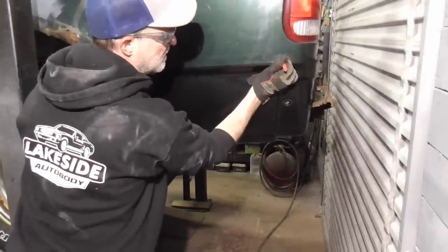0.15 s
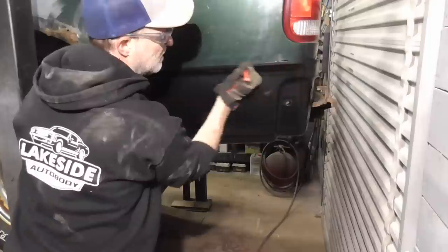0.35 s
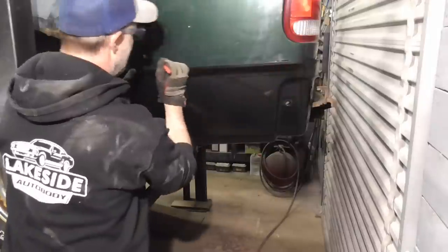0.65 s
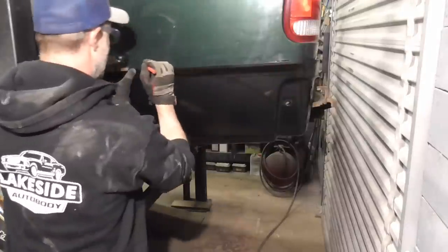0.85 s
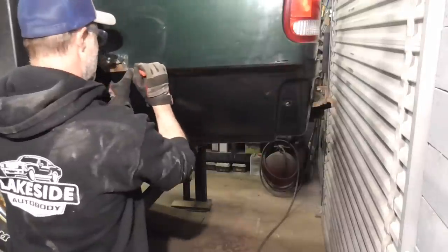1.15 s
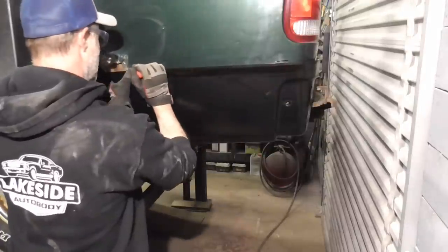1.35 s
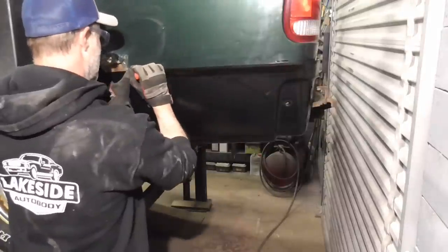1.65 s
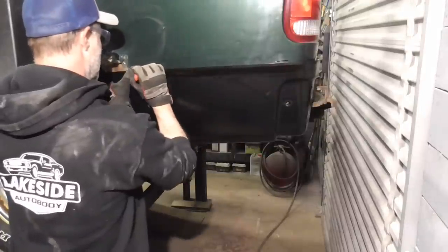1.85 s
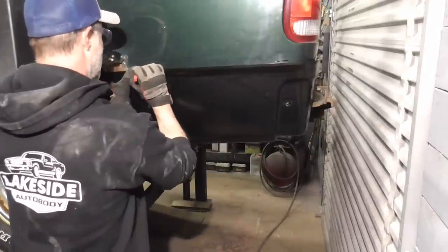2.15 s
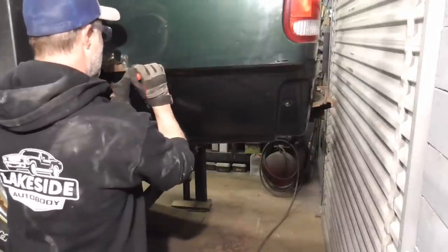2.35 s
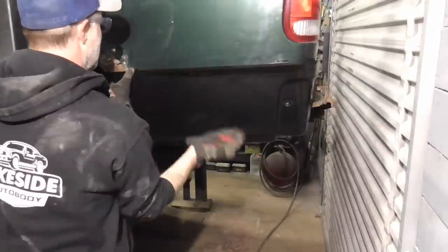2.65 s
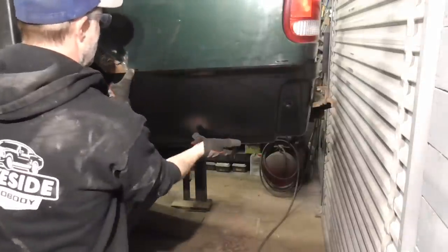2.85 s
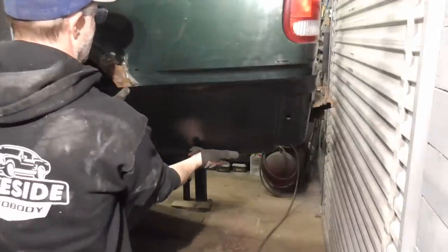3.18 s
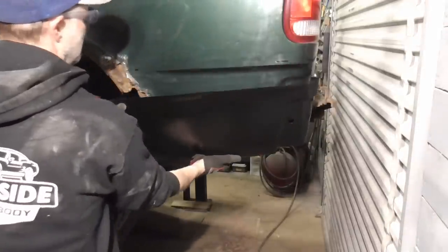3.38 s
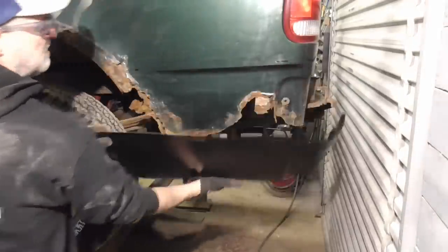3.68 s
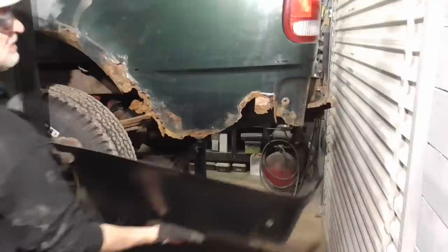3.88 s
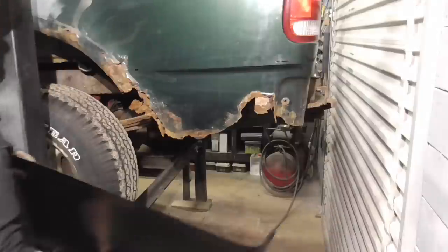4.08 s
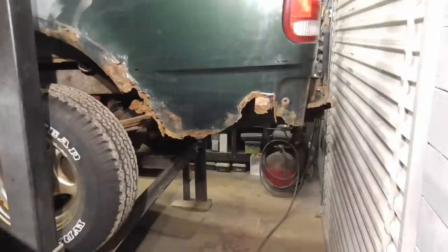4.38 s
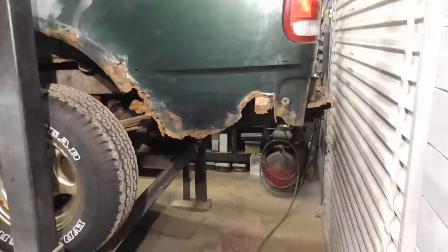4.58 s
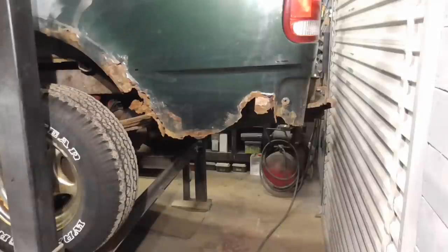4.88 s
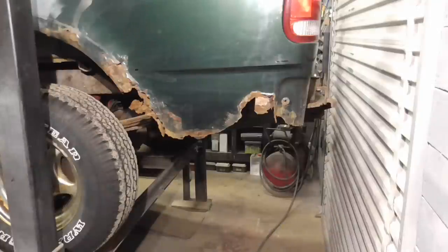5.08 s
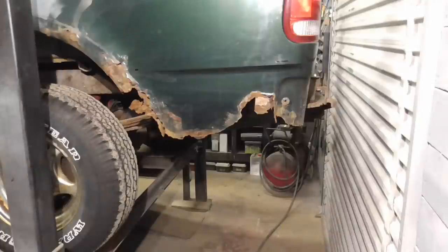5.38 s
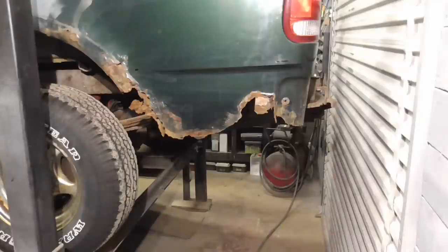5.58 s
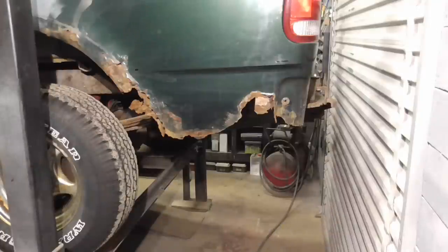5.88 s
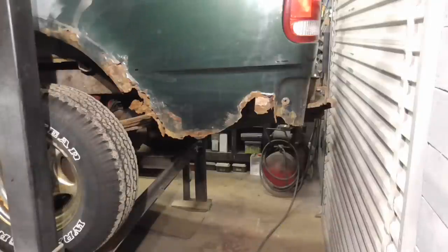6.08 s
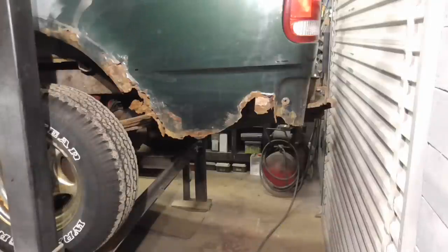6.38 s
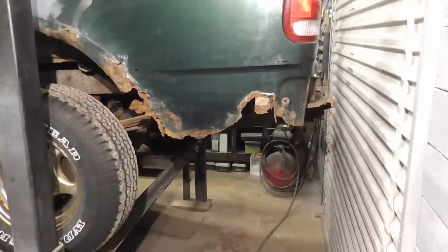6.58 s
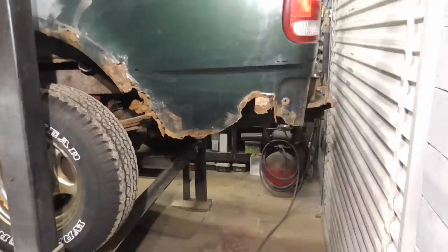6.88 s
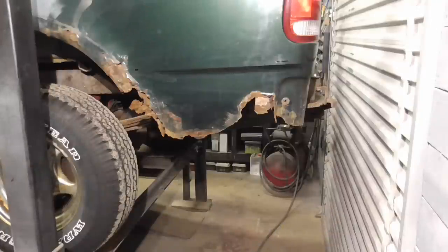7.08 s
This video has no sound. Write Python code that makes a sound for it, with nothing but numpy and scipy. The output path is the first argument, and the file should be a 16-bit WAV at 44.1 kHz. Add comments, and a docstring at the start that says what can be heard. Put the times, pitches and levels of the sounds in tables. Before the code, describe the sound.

A low, steady ventilation-like noise runs throughout a workshop, heard in stereo from fairly close. From 0 to 2.6 seconds, gloves rub softly on paint and a thin steel panel, with a dull bump at 0.3, faint knocks near 1.0 and a clearer tap at 1.4, plus light dragging. At 2.7 to 3.6 the panel comes off the truck body: sharp tinny knocks, strongest around 2.9 and 3.2, scrapes, short hollow hums and a thin squeal at 3.5. Crisp grit ticks follow until 3.9. Fabric swishes faintly around 4.2, a shoe scuffs at 4.5, and soft steps fall near 4.9, 5.3 and 5.9. At 6.35 the sheet's edge hits the floor with a loud ringing clatter, bounces at 6.5, then skids, judders and scrapes with a hollow hum near 6.9, damping out after 7.0.

```python
"""Rubs, knocks and scrapes of a thin steel panel held on a truck body in a workshop, then steps and a shoe scuff
as it is carried off; it lands on its edge with a ringing clatter and slides to rest over a low, steady noise.
Blows are noise bursts plus ringing sine modes; rubbing is noise chopped into tiny slips, which on steel also
excite the modes. Low thuds and short hums are swelling sines, a squeal and a fabric swish are fuzzy tones,
grit is short bright noise and the ventilation-like room is steady coloured noise."""
import sys
import numpy as np
from scipy import signal
from scipy.fft import rfft, irfft
from scipy.io import wavfile

SR = 44100
rng = np.random.default_rng(int(sys.argv[2]) if len(sys.argv) > 2 else 0)


def unload_audio(sound):
    """Save the sound as a 16-bit wav file, at the path given as the first command line argument."""
    columns = np.transpose(np.atleast_2d(sound))
    # keep every value between -1 and 1, then stretch to whole-number steps
    steps = np.round(np.clip(columns, -1, 1) * 32767)
    wavfile.write(sys.argv[1], SR, steps.astype(np.int16))


N = 319284

# Bass, body, clank, rasp and hiss bands. Each row: low edge in Hz, high edge in Hz.
BANDS = [(60, 260), (260, 650), (650, 1500), (1500, 5500), (5500, 16000)]
BAND_HZ = np.sqrt(np.prod(BANDS, axis=1))  # band centres

# Blows on the held panel. Each row: start in seconds, level in dB, brightness in dB per octave, bass thud in dB,
# t60 at 1 kHz in seconds, contact crack in dB re level, ring in dB, favoured pitch in Hz.
KNOCKS = [(0.957, -50.5, -1, 13.5, 0.25, 4, -61, 530), (1.413, -37.5, -0.86, 7, 0.23, -14, -77, 2170),
          (2.678, -46, -2, 2, 0.36, 8, -78, 1130), (2.836, -43, -2.7, 8.5, 0.28, -4, -68, 820),
          (2.935, -28.5, 0, 0.5, 0.31, 4.5, -39.5, 3050), (3.17, -26, -0.74, -0.5, 0.27, 4.5, -34.5, 1060),
          (3.256, -35.5, -4.5, -10, 0.29, -4, -50, 3500), (3.496, -40.5, 2.7, -7, 0.16, 0, -62, 1600),
          (3.562, -36.5, -0.7, 1, 0.39, 5, -45, 2670)]
# The panel's edge hits the floor and bounces. Each row: start in seconds, level in dB, brightness in dB per
# octave, bass thud in dB, t60 at 1 kHz in seconds, crack in dB re level, ring in dB, favoured pitch in Hz.
CLATTERS = [(6.347, -23, -3.02, -4, 0.24, -15, -31, 347), (6.359, -32.5, -9.5, -5.5, 0.4, -3, -56, 650),
            (6.388, -30, -7, -6.5, 0.66, -10, -62, 426), (6.506, -31, -1.3, 8.5, 0.62, -12, -38.5, 1010)]
# The panel's edge drags on the truck body. Each row: start, rise, hold and fade t60 in seconds, level in dB,
# brightness in dB per octave.
DRAGS = [(1.16, 0.015, 0.3, 0.14, -58.5, -2.5), (2.37, 0.022, 0.031, 0.26, -52, -3),
         (2.815, 0.01, .015, 1, -45, -0.3), (2.98, 0.028, 0.23, 0.29, -50.5, 0),
         (3.14, 0.017, .005, 0.092, -37.5, 0), (3.18, 0.069, 0.25, 0.29, -45, -4),
         (3.245, 0.0053, 0.0051, 0.74, -39.5, 0.25), (3.483, 0.01, 0.075, 0.1, -37, 0),
         (3.55, 0.04, 0.036, 0.81, -63, -10)]
# The standing panel skids, judders along the floor and scrapes to rest. Each row: start, rise, hold and
# fade t60 in seconds, level in dB, brightness in dB per octave.
SLIDES = [(6.512, 0.013, 0.0092, 0.18, -36.5, 2), (6.66, 0.12, 0.2, 0.91, -32.5, -4),
          (6.825, 0.026, 0.054, 0.89, -32, -.5)]
# Dull footfall bumps, panel modes humming and the sheet's bass bumps. Each row: start in seconds, level in dB,
# pitch in Hz, rise in seconds, t60 in seconds.
THUDS_AND_HUMS = [(0.293, -39.5, 170, .012, 0.26), (0.992, -39, 147, .01, 0.15),
                  (2.391, -43, 173, 0.012, 0.11), (2.938, -30.5, 333.3, 0.011, 0.41),
                  (3.17, -27, 493.4, 0.0088, 0.5), (3.195, -26, 328.6, 0.019, 0.15),
                  (3.21, -41, 67.3, .05, 0.96), (3.276, -33.5, 177, 0.024, 0.12),
                  (3.33, -31, 196, 0.0094, 0.15), (3.391, -26.5, 139, 0.038, 0.046),
                  (3.511, -24.5, 338.2, 0.05, 0.39), (6.344, -23, 251, 0.004, 0.14),
                  (6.504, -21, 183, .003, 0.048), (6.921, -24, 408.6, 0.077, .3),
                  (6.95, -32, 179.2, 0.02, 0.43)]
# Narrow fuzzy bands: a thin squeal of the rubbed sheet, then a whistling swish of fabric. Each row: start, rise,
# hold and fade t60 in seconds, level in dB, pitch in Hz, sag in Hz per second (negative climbs), width in Hz.
SQUEAL_AND_SWISH = [(3.473, .05, 0.025, 0.4, -42.5, 3420, -5, 109),
                    (4.135, 0.093, 0.11, .4, -54, 4450, 606, 510)]
# Small sharp ticks of grit. Each row: start in seconds, level in dB, pitch in Hz.
TICKS = [(2.3727, -41, 11400), (3.0592, -29, 12200), (3.6607, -21.5, 13500), (3.768, -31, 12300),
         (3.8938, -32.5, 12360), (3.911, -28, 9560)]
# The glove rubs on the paint. Each row: start, rise, hold and fade t60 in seconds, level in dB,
# brightness in dB per octave.
GLOVE_RUBS = [(0.045, 0.023, .02, 0.27, -50, -2), (0.175, 0.011, 0.016, 0.41, -44.5, -6),
              (0.33, 0.1, 0.2, .5, -68, 5.5), (0.48, 0.1, 0.26, 0.29, -55.5, 1.5),
              (0.95, 0.016, 0.024, 0.96, -63.5, 1), (1.155, .012, 0.0091, 0.23, -46.5, -1),
              (1.28, 0.078, .02, 0.091, -71, 4), (2.19, 0.035, .01, 0.14, -49.5, -4.5),
              (2.368, 0.0041, .01, 0.1, -41, -2.5), (2.52, 0.055, .01, 0.32, -57, -0.5)]
# Soles and clothes brush along. Each row: start, rise, hold and fade t60 in seconds, level in dB,
# brightness in dB per octave.
SCUFFS = [(3.91, 0.048, 0.009, 0.36, -59, 2.5), (4.17, 0.245, 0.036, 0.18, -49, 1.5),
          (4.453, 0.02, 0.087, 0.26, -38, 0), (5.08, 0.039, 0.035, 0.14, -55.5, -8),
          (5.3, .17, 0.0098, 0.38, -55.5, 1.14), (5.855, 0.017, 0.12, 0.19, -57.5, 1.75)]
# Footfalls and dull bumps. Each row: start in seconds, level in dB, brightness in dB per octave,
# bass thud in dB, t60 at 1 kHz in seconds, favoured pitch in Hz.
STEPS = [(4.306, -50, 1, 14, 0.18, 110), (4.928, -40, -2.56, -23, 0.29, 1260),
         (5.234, -55.5, -8, -3.5, 0.099, 395), (5.377, -51.5, -6.5, -6, .1, 260),
         (5.878, -45, -4, -4.5, 0.16, 790), (5.892, -59.5, -7.5, 1.5, 0.14, 130)]

# Panel modes when held, standing on its edge, and leaning. Each row: pitch in Hz, relative level in dB,
# t60 in seconds.
HELD_MODES = [(339, 9, 0.45), (456, -1, 0.7), (513, 3, 0.7), (565, -4, 0.7), (631, -4, 0.6), (775, 2, 0.3),
              (866, 4, 0.35), (903, -2, 1.0), (946, 1, 0.8), (972, -2, 0.9), (995, -2, 0.9), (1196, 6, 1.3),
              (1232, 4, 0.3), (1316, 4, 0.7), (1338, -1, 0.8), (1540, 1, 1.1), (1604, -2, 0.9),
              (1724, -1, 0.9), (1946, -2, 0.7), (2137, 4, 0.6), (2150, 9, 0.25), (2222, 0, 0.8),
              (3363, -2, 0.6), (4060, 3, 0.25), (4660, -1, 0.25)]
ON_EDGE_MODES = [(138, 4, 1.0), (151, 3, 1.0), (184, 0, 0.8), (233, -3, 1.6), (323, 3, 1.6), (371, -2, 1.6),
                 (413, 0, 1.6), (437, 12, 1.4), (460, -1, 1.6), (534, -2, 1.6), (583, 1, 1.6),
                 (724, 9, 1.6), (789, -2, 1.6), (898, 3, 1.2), (1074, 2, 1.6), (1191, 5, 1.1),
                 (1237, -1, 1.2), (1320, 2, 1.2), (1353, 0, 1.3), (1400, 8, 1.4), (1665, 6, 1.3),
                 (1813, 0, 1.3), (1946, 0, 1.2), (2129, 8, 1.2), (2356, 1, 1.0), (2449, 3, 1.1),
                 (2568, 2, 0.9), (2757, 0, 1.2), (2972, 1, 1.0), (4124, 2, 0.9)]
LEANING_MODES = [(122, 1, 0.8), (166, 6, 0.7), (195, 0, 1.1), (312, 2, 1.1), (371, 6, 0.8), (408, 9, 0.4),
                 (432, 2, 0.5), (459, 0, 0.7), (536, 2, 0.6), (634, 7, 0.6), (724, 3, 0.8), (767, 1, 1.1),
                 (911, 5, 1.1), (950, 2, 0.6), (989, 4, 0.5), (1130, 3, 0.9), (1525, 3, 1.1),
                 (1647, 3, 1.1), (1950, 4, 0.8), (2063, 5, 0.9), (2132, 3, 0.8), (2757, 3, 0.9),
                 (4114, 1, 0.5)]

# How each contact shares its sound among the bands. Each entry: offset in dB, one per band from bass to hiss.
KNOCK_SHAPE = [0, -1, 1, -1, 0]
CLATTER_SHAPE = [-19, -14, -3.5, -3, 6]
STEP_SHAPE = [-1, -6.5, 0, 2, 4.5]
DRAG_SHAPE = [-3.4, -4.4, -4.7, -4.4, 0.2]
SLIDE_SHAPE = [-23, -6.5, -4, -6, 0.5]
# Light rubbing only reaches the top bands. Each entry: offset in dB, the last one for hiss.
SCUFF_SHAPE = [0, -3, 0]
GLOVE_SHAPE = [-6, 0]

# Broad noise colours of panel, floor, glove and room. Each row: frequency in Hz, relative spectrum level in dB.
HELD_COLOUR = [(30, 0), (65, -21), (140, -1), (260, -9), (340, -2.5), (600, -6), (850, -2), (1300, -9),
               (1750, -20.5), (2200, -17), (2700, -24), (4100, -20.5), (6300, -25.5), (12500, -14),
               (16000, -28.5)]
FREE_COLOUR = [(30, -60), (70, -35), (140, 3.5), (240, -10), (375, -4.5), (437, 0.5), (560, -2.5),
               (780, 7.5), (1200, 0.5), (1750, -12), (2150, -7), (4100, -17), (6000, -35), (11000, -30.5),
               (16000, -48)]
STEP_COLOUR = [(35, -41), (60, -20), (118, -0.5), (202, -9), (398, -7.5), (882, -0.5), (1170, -8.5),
               (1700, -25.5), (2350, -18.5), (2900, -22), (3580, -18.5), (5860, -20), (7940, -10.5),
               (13000, -13), (16000, -27)]
GLOVE_COLOUR = [(710, -38), (1200, -3.5), (2180, -4.5), (3010, -7), (3830, -2.5), (6800, -6), (12700, 4.5),
                (14800, -7), (16000, -27)]
AIR_COLOUR = [(15, -67), (25, -47), (45, -13.5), (92, -5), (161, 1), (229, -5), (344, -10), (384, -6),
              (416, -11.5), (695, -6), (818, -9.5), (1400, -14), (1740, -25.5), (3250, -29), (3620, -25),
              (5000, -31), (6050, -32), (8140, -28), (16000, -27)]

# Left-right likeness at each place. Each row: frequency in Hz, correlation from -1 to 1.
HELD_SAME = [(60, 1), (180, 1), (550, 0.76), (1650, 0.6), (4970, 0.47), (15000, 0.22)]
FREE_SAME = [(60, 1), (180, 0.84), (550, 0.68), (1650, 0.56), (4970, 0.36), (15000, -0.31)]
AIR_SAME = [(60, 1), (180, 0.93), (550, 0.63), (1650, 0.57), (4970, 0.27), (15000, 0.052)]
# Stereo balance at each place. Each row: frequency in Hz, left over right in dB.
HELD_SIDE = [(60, 3.5), (180, -1.1), (550, -0.3), (1650, -2), (4970, -1.5), (15000, -1)]
FREE_SIDE = [(60, -0.17), (180, 0.078), (550, 1.0), (1650, 0.36), (4970, -0.049), (15000, -2.9)]
AIR_SIDE = [(60, 0.58), (180, -1.3), (550, 0.95), (1650, -0.17), (4970, -0.22), (15000, -1.2)]


def held_panel():
    """Knocks and dragging against the truck body; once it is free, the gloves grip it and deaden its ring."""
    place = HELD_COLOUR, HELD_SAME, HELD_SIDE, 3.5  # last: ripple in dB
    knocks = struck_panel(KNOCKS, HELD_MODES, KNOCK_SHAPE, place, clang_db=5, focus_db=15.5, lag=0.011,
                          tail_db=-31, tail_t60=0.33, damping=0.074)
    drag = friction(DRAGS, DRAG_SHAPE, place, slips_per_s=500, spread_db=3.5, smooth=0.5, t60=0.04)
    grip_s, grip_db_per_s = 3.6, 50
    grip = amp(-grip_db_per_s * np.maximum(np.arange(N) / SR - grip_s, 0))
    return grip * (knocks + singing(drag, HELD_MODES, ring_db=-13.5, top_hz=1580))


def panel_set_down():
    """Free of the hands, the sheet clatters, rings long and slides to rest, where leaning damps it."""
    place = FREE_COLOUR, FREE_SAME, FREE_SIDE, 4  # last: ripple in dB
    clatter = struck_panel(CLATTERS, ON_EDGE_MODES, CLATTER_SHAPE, place, clang_db=11.5, focus_db=9, lag=0.0033,
                           tail_db=-14, tail_t60=0.7, damping=0.024)
    slide = friction(SLIDES, SLIDE_SHAPE, place, slips_per_s=790, spread_db=3.5, smooth=1.0, t60=0.075)
    rest_s, damping_db_per_s = 7.03, 15
    rest = amp(-damping_db_per_s * np.maximum(np.arange(N) / SR - rest_s, 0))
    return rest * (clatter + singing(slide, LEANING_MODES, ring_db=-9, top_hz=1400))


def thuds_and_hums():
    """Dull footfall bumps, humming panel modes and the sheet's bass bumps, each a swelling, dying sine."""
    out = np.zeros((2, N))
    for s, db, hz, rise, t60 in THUDS_AND_HUMS:
        envelope = stroke_envelope(rise, 0, t60)
        t = np.arange(len(envelope)) / SR
        add(out, s, amp(db) * envelope * np.sin(2 * np.pi * hz * t))
    return out


def squeal_and_swish():
    """A thin squeal, then a whistling fabric swish: slow noise modulates a sine whose pitch slides steadily."""
    out, t = np.zeros((2, N)), np.arange(SR) / SR
    for s, rise, hold, fade, db, hz, sag, width_hz in SQUEAL_AND_SWISH:
        envelope = stroke_envelope(rise, hold, fade)[:SR]
        fuzz = lowpass(rng.standard_normal((2, SR)), width_hz / 2)
        carrier = np.sin(2 * np.pi * np.cumsum(hz - sag * t) / SR)
        tone = evened(fuzz * carrier)
        add(out, s, amp(db) * envelope * tone[:, :len(envelope)])
    return out


def grit():
    """Flakes of rust tick on the sheet: a very short bright noise burst with a faint tail."""
    out, t = np.zeros((2, N)), np.arange(SR // 8) / SR
    for s, db, hz in TICKS:
        # rises towards the pitch; above it stays at the last level
        colour = [(hz / 2.5, -25), (hz / 1.1, -3), (hz, 0), (hz * 0.99, -9)]
        fade = amp(-60 * t / 0.0045) + amp(-24 - 60 * t / 0.38)
        tick = fade * noise_pair(colour, HELD_SAME, HELD_SIDE, ripple_db=4, size=len(t))
        add(out, s, amp(db) * band(tick, BANDS[-1]))
    return out


def worker():
    """The glove's hiss on paint, then steps and scuffs on the concrete."""
    ripple_db = 1.2
    paint = GLOVE_COLOUR, HELD_SAME, AIR_SIDE, ripple_db
    concrete = STEP_COLOUR, FREE_SAME, AIR_SIDE, ripple_db
    out = friction(GLOVE_RUBS, GLOVE_SHAPE, paint, slips_per_s=4600, spread_db=8, smooth=1.0, t60=0.051)
    out += friction(SCUFFS, SCUFF_SHAPE, concrete, slips_per_s=810, spread_db=0.5, smooth=0.66, t60=0.068)
    for s, db, brightness, thud_db, t60, favoured_hz in STEPS:
        levels = band_levels(STEP_SHAPE, db, brightness, thud_db)
        step = blow(levels, t60, lag=0.00037, crack_db=-75, place=concrete,
                    tail_db=-34, tail_t60=0.45, damping=0.01)
        add(out, s, clang(step, favoured_hz, gain_db=9.0))
    return out


def room_air():
    """The low, steady ventilation-like noise of the room: coloured noise at a constant level."""
    level_db = -51
    return amp(level_db) * noise_pair(AIR_COLOUR, AIR_SAME, AIR_SIDE, ripple_db=1.0, size=N)


def struck_panel(rows, modes, shape, place, clang_db, focus_db, **contact):
    """Each blow also rings the panel's long modes, focus_db weaker for each octave from the pitch it favours."""
    out = np.zeros((2, N))
    for s, db, brightness, thud_db, t60, crack_db, ring_db, favoured_hz in rows:
        hz, rings = mode_rings(modes)
        mode_gain = amp(ring_db - focus_db * abs(np.log2(hz / favoured_hz)))
        ring = np.tensordot(mode_gain, rings, 1)
        ring *= 1 - np.exp(-np.arange(ring.shape[1]) / SR / 0.00055)  # soft onset
        levels = band_levels(shape, db, brightness, thud_db)
        hit = blow(levels, t60, crack_db=crack_db, place=place, **contact)
        add(out, s, ring + clang(hit, favoured_hz, clang_db))
    return out


def blow(levels, t60, lag, crack_db, place, tail_db, tail_t60, damping):
    """A contact crack, then a crowd of short modes and room echoes; bending waves bring the bass late."""
    t = np.arange(SR) / SR
    crowd, out = noise_pair(*place, size=SR), np.zeros((2, SR))
    for edges, khz, db in zip(BANDS, BAND_HZ / 1000, levels):
        swell = 1 - np.exp(-t * khz / (lag / 2 + 1e-5))
        body_fade = amp(-60 * t / (t60 * khz ** -damping))  # treble dies sooner
        echo_fade = amp(tail_db - 60 * t / tail_t60)
        crack = amp(crack_db - 60 * t / 0.012) * min(khz, 1)
        envelope = swell * np.hypot(body_fade, echo_fade) + crack
        out += amp(db) * evened(band(crowd, edges)) * envelope
    return out


def friction(strokes, shape, place, slips_per_s, spread_db, smooth, t60):
    """Each stroke is a run of tiny slips of uneven size, each slip a short dying burst."""
    out = np.zeros((2, N))
    for s, rise, hold, fade, db, brightness in strokes:
        envelope = stroke_envelope(rise, hold, fade)[:SR]
        is_slip = rng.random(SR) < slips_per_s / SR
        slips = is_slip * amp(spread_db * np.minimum(rng.exponential(1, SR), 4))
        power = signal.lfilter([1], [1, -amp(-60 / t60 / SR) ** 2], slips ** 2)
        roughness = np.hypot(evened(np.sqrt(power)), smooth)  # smooth adds a steady hiss
        rub = roughness * noise_pair(*place, size=SR)
        levels = band_levels(shape, db, brightness)
        sound = sum(amp(level) * evened(band(rub, edges))
                    for edges, level in zip(BANDS[-len(shape):], levels))
        add(out, s, sound[:, :len(envelope)] * envelope)
    return out


def singing(rub, modes, ring_db, top_hz):
    """Rubbing keeps the panel's modes ringing, mostly those under top_hz."""
    response = mode_rings(modes)[1].sum(0)
    response = response / np.linalg.norm(response[0])
    ring = signal.fftconvolve(lowpass(rub, top_hz), response, axes=1)[:, :N]
    return rub + amp(ring_db) * ring


def mode_rings(modes):
    """Frequencies and dying stereo sines of the modes; the sheet's slow wobble bends each pitch a little."""
    hz, db, t60 = np.transpose(modes)
    t = np.arange(SR) / SR
    one_each = (len(hz), 1, 1)
    phase = rng.uniform(0, 2 * np.pi, one_each) + 0.14 * rng.standard_normal((len(hz), 2, 1))
    wobble_hz = rng.uniform(2.33, 7.7, one_each)
    wobble = 0.5 * np.sin(2 * np.pi * (wobble_hz * t + rng.random(one_each)))
    fade = amp(db[:, None] - 60 * t / t60[:, None])
    return hz, fade[:, None] * np.sin(2 * np.pi * hz[:, None, None] * t + phase + wobble)


def clang(x, hz, gain_db):
    """Where and how hard a thing is struck lifts a broad range around one pitch."""
    b, a = signal.iirpeak(hz, 1.2, fs=SR)
    return x + (amp(gain_db) - 1) * signal.lfilter(b, a, x)


def band_levels(shape, db, brightness, thud_db=0):
    """Levels of the top bands of a contact: brightness tilts them about 1 kHz, a heavy touch adds bass."""
    hz = BAND_HZ[-len(shape):]
    tilt = brightness * np.log2(hz / 1000)
    return db + np.array(shape) + tilt + thud_db * (hz == BAND_HZ[0])


def stroke_envelope(rise, hold, t60):
    """A sound swells, holds, and dies away."""
    t = np.arange(0, rise + hold + t60, 1 / SR)
    swell = np.sin(np.pi / 2 * np.minimum(t / rise, 1)) ** 2
    return swell * amp(-60 * np.maximum(t - rise - hold, 0) / t60)


def noise_pair(colour, same, side, ripple_db, size):
    """Coloured left-right noise, partly alike; crowded modes ripple the spectrum."""
    hz = np.fft.rfftfreq(size, 1 / SR)
    knots = np.arange(0, SR / 2, 90)
    ripple = np.interp(hz, knots, rng.standard_normal(len(knots))) * np.minimum(hz / 2000, 1)
    common, apart = rfft(rng.standard_normal((2, size)))
    likeness = np.clip(read(same, hz), -1, 1)
    sign = np.array([[1], [-1]])  # left, right
    pair = np.sqrt(1 + likeness) * common + sign * np.sqrt(1 - likeness) * apart
    pair = pair * amp(sign * read(side, hz) / 2)
    return evened(irfft(pair * amp(read(colour, hz) + ripple_db * ripple), size))


def band(x, edges):
    """Causal band-pass."""
    return signal.sosfilt(signal.butter(4, edges, "band", fs=SR, output="sos"), x)


def lowpass(x, hz):
    """Gentle causal low-pass."""
    return signal.sosfilt(signal.butter(2, hz, fs=SR, output="sos"), x)


def amp(db):
    """Decibels to gain."""
    return 10 ** (np.asarray(db) / 20)


def evened(x):
    """Scales to rms 1."""
    return x / np.sqrt(np.mean(x ** 2) + 1e-20)


def read(points, hz):
    """Reads (Hz, value) points on a log-frequency axis."""
    f, value = np.transpose(points)
    return np.interp(np.log(hz + 1), np.log(f + 1), value)


def add(mix, s, sound):
    """Mixes a sound into the stereo mix at time s."""
    part = mix[:, max(round(s * SR), 0):][:, :sound.shape[-1]]
    part += sound[..., :part.shape[1]]


def scene():
    """Panel and worker over the steady room noise."""
    panel = held_panel() + panel_set_down()
    details = thuds_and_hums() + squeal_and_swish() + grit()
    return panel + details + worker() + room_air()


def record(dry):
    """Band limit: a steep low-pass takes off the very top of the treble."""
    edge_hz = 16100
    lowpass_taps = signal.firwin(255, edge_hz, window=("kaiser", 9), fs=SR)
    return signal.oaconvolve(dry, lowpass_taps[None], "same")


dry = scene()
out = record(dry)
unload_audio(out)
```